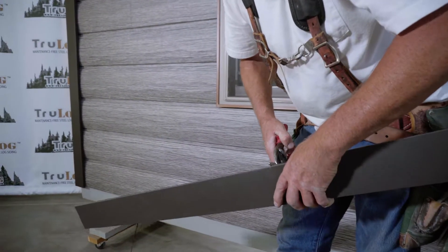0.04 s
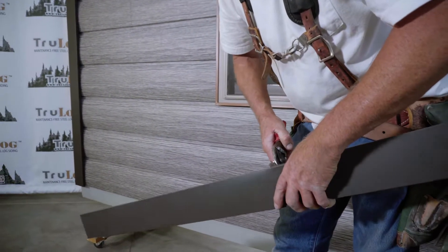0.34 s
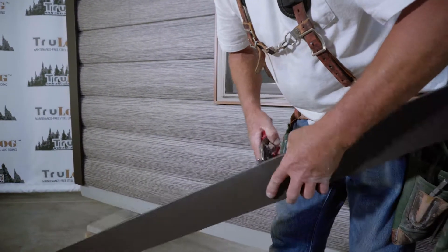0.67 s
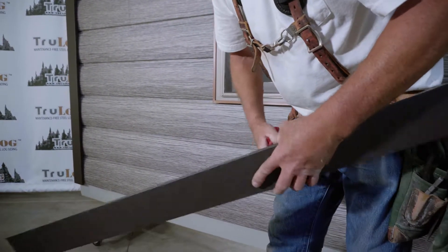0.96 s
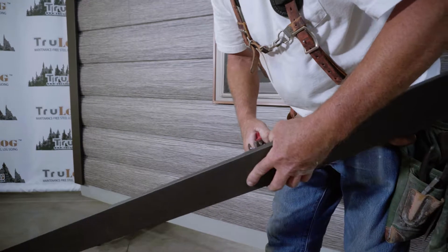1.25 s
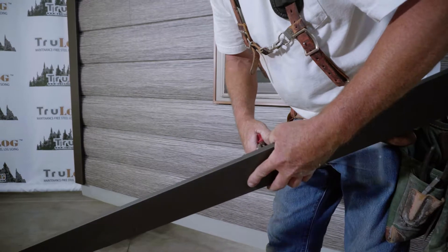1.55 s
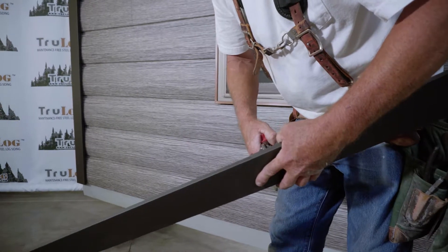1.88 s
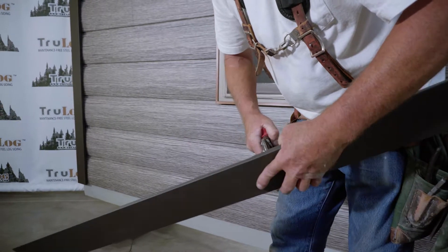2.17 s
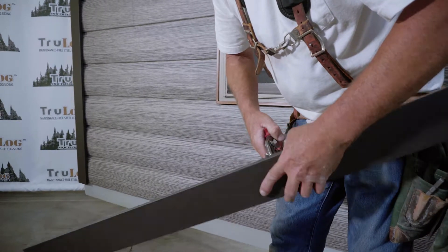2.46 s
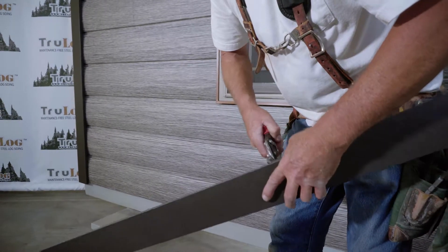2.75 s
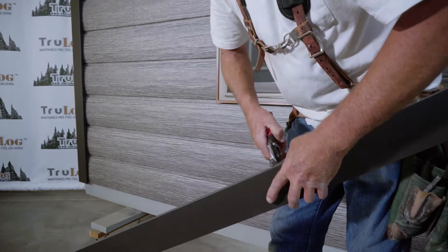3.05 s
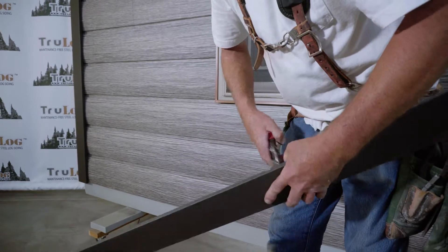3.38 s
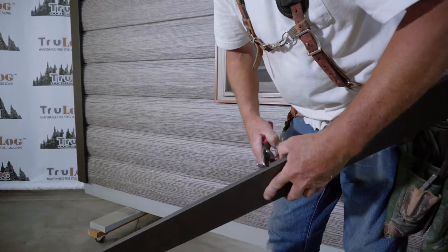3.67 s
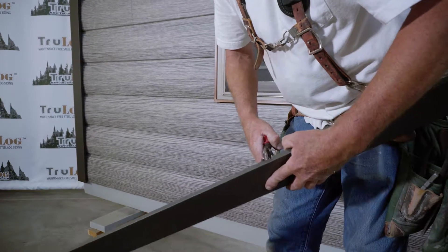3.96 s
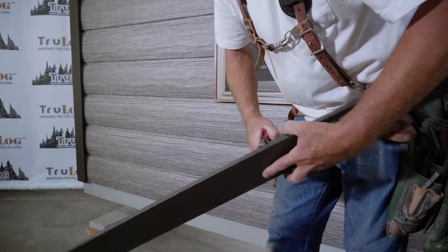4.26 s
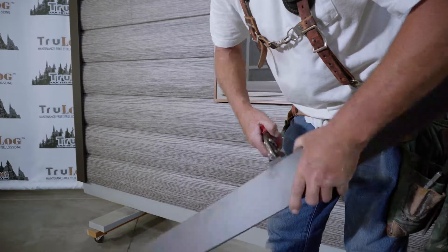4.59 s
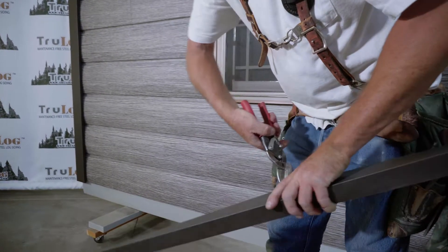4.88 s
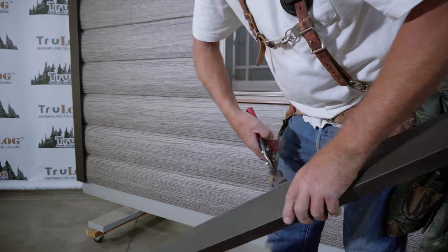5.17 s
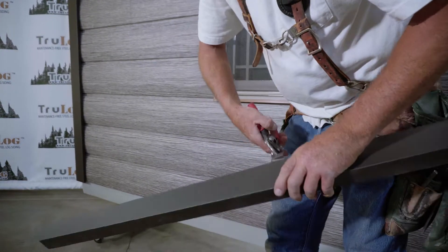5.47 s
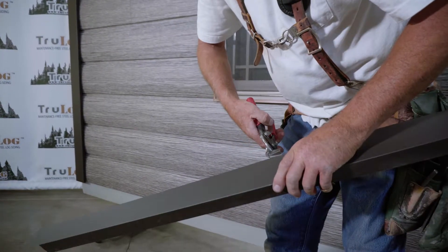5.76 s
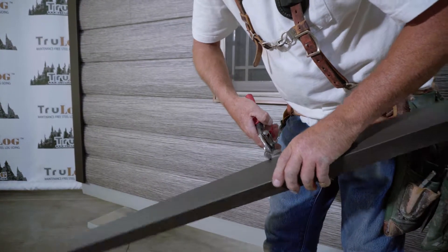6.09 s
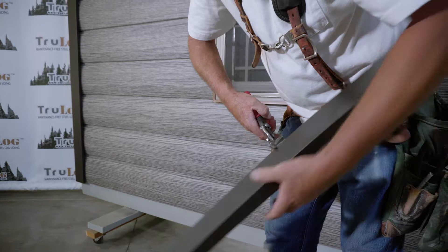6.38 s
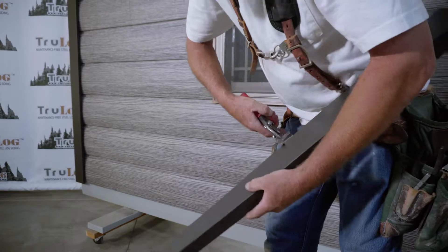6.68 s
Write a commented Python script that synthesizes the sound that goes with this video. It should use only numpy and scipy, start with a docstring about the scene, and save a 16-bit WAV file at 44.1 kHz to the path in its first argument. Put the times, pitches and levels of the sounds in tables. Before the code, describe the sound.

Hand snips cut a long sheet metal trim panel in a quiet workshop with a faint hush and a short room echo. It opens with a faint metallic ring, light pivot creaks and small, close jaw clicks. At about 0.9 seconds comes the loudest bite, a crisp crunch with a damped clang. A cluster of sharp snips follows from 1.5 to 2 seconds, setting the panel's edge ringing. Near 2.4 seconds the blade gives one brief, high squeal. More snips and a hard click fall between 3 and 3.5 seconds, then a longer crunch around 4 seconds. The blades rub softly along the cut edge between bites. A sharp click at 5.1 seconds leads to lighter bites and scraping from 5.5 to 6 seconds. At about 6.5 seconds the last bite snaps through with a bright ring, and the loose panel is knocked just after.

```python
"""Hand snips cutting sheet metal

Snips work through a long metal trim panel in a quiet workshop. Each bite is a run of tiny fractures
that sets the panel clanging and its folded edge ringing. Between bites the jaws click, creak, rub along
the cut edge and squeal once. The last bite snaps through, and the loose panel is knocked."""
import sys
import numpy as np
from scipy import signal
from scipy.fft import rfft, irfft, next_fast_len
from scipy.io import wavfile

SR = 44100
rng = np.random.default_rng(int(sys.argv[2]) if len(sys.argv) > 2 else 0)


def generate_wav(signal):
    """Clip the signal to [-1, 1] and save it as 16-bit WAV at the path in sys.argv[1]."""
    frames = np.transpose(np.atleast_2d(signal))
    scaled = np.clip(frames, -1, 1) * 32767
    pcm = np.round(scaled).astype(np.int16)
    wavfile.write(sys.argv[1], SR, pcm)


N = 301203
TIME = np.arange(N) / SR

# Tone colours of the still air, the panel's blur of close notes, and scratching steel.
# Each row: frequency in Hz, relative level in dB.
AIR_SPECTRUM = [(25, -17.5), (55, -13), (80, 4.5), (105, -3.5), (250, -8), (450, -8), (900, -4.5),
                (1400, -11.5), (2500, -12.5), (5000, -19.5), (13000, -20), (15500, -24.5)]
SHEET_SPECTRUM = [(75, -29), (160, -23.5), (205, -14.5), (270, -15.5), (370, -12), (480, -3.5),
                  (590, -17.5), (800, -13), (1020, -14.5), (1420, 4), (1700, -16.5), (1980, -4.5),
                  (2950, -22), (4000, -23.5), (5200, -25.5), (5900, -29.5), (7400, -31), (15500, -49.5)]
SCRATCH_SPECTRUM = [(1800, -23.5), (2700, 15.5), (3400, 1), (5200, -3.5), (8000, -5.5), (11000, -16.5),
                    (15500, -8.5)]

# Blades and hand sliding along the sheet.
# Each row: start in seconds, length in seconds, panel level in dB, scratch level in dB.
RUB_STROKES = [(0.207, 0.053, -69.5, -71), (0.35, 0.091, -61.5, -72), (0.548, 0.058, -63.5, -65),
               (0.642, 0.34, -60, -68), (0.937, 0.18, -61, -73), (1.288, .13, -51.5, -85),
               (1.407, 0.041, -61, -66), (1.698, 0.19, -49, -63.5), (2.001, .12, -54.5, -62),
               (2.227, 0.032, -61, -67), (2.52, 0.15, -66, -67.5), (2.936, 0.2, -61, -68),
               (3.36, 0.084, -69, -62), (3.866, 0.036, -54, -75), (4.1, 0.24, -60, -72),
               (4.353, 0.14, -63, -76.5), (4.524, 0.4, -65.5, -89), (5.085, 0.07, -57.5, -66),
               (5.607, 0.3, -53.5, -69.5), (5.981, 0.072, -50.5, -76), (6.2, 0.2, -58, -69),
               (6.502, 0.25, -46, -66)]
# The tones in the squeal. Each row: multiple of the lowest pitch, relative level in dB.
SQUEAL_TONES = [(1, 4), (2, 0), (3, -13.5), (4, -18)]
# Creaks of the pivot. Each row: start in seconds, length in seconds, knock level in dB.
PIVOT_CREAKS = [(0.138, .06, -57), (0.373, .11, -59.5), (0.73, .06, -60), (2.38, .015, -56),
                (2.695, .035, -57), (3.337, .03, -59), (5.15, .075, -57)]
# Hard catches of the jaws. Each row: start in seconds, pivot pitch in Hz, knock in dB, blade tick in dB.
JAW_CATCHES = [(0.4596, 2660, -49.5, -62), (0.4937, 2180, -46, -65.5), (0.578, 2550, -57, -53),
               (0.9867, 2800, -54, -55.5), (1.479, 2530, -53.5, -62.5), (2.1113, 2720, -51.5, -56),
               (2.2227, 2140, -52.5, -54), (2.909, 2390, -50, -47), (3.2654, 2200, -34, -54.5),
               (5.1054, 2674, -35.5, -45)]
# A mode is a note that an object rings at by itself. These belong to the blades.
# Each row: pitch in Hz, width in Hz (wider dies sooner), relative level in dB.
BLADE_MODES = [(4120, 1000, -1.5), (5240, 440, -4), (6500, 830, -3), (7330, 540, -7.5), (9700, 2500, 7)]

# Blows that ring the folded edge. Each row: start in seconds, level in dB.
EDGE_HITS = [(0.0, -47.5), (1.513, -36.5), (1.821, -39.5), (3.001, -42.5), (3.419, -38.5), (6.46, -32)]
# The folded edge's two modes. Each row: pitch in Hz, relative level in dB, ring time in seconds.
# A ring time (t60) is how long a sound takes to fall by 60 dB.
FOLD_MODES = [(1161, 0, .45), (1147, -8, .38)]
# The panel's clear modes.
# Each row: pitch in Hz, relative dB while whole, relative dB once cut through, ring time in seconds.
PANEL_MODES = [(211.6, -16.5, -25.5, .6), (240, -14, -23, 0.72), (420, -17.5, -21, .4),
               (448, -15, 1.5, 0.31), (468, -5, 0, 0.56), (746, -17, -11, 0.6), (1030, -13, -1.5, .25),
               (1153, 4.5, -4.5, 0.36), (1438, 10, 6, 0.19), (1496, 2, 4, 0.31), (1550, -11.5, -3, .45),
               (1936, -7.5, -1, 0.58), (1980, -5, 4, 0.39), (2520, -5, 5.5, 0.38), (2614, -8.5, 0, 0.29),
               (3267, -16, -14, 0.35), (3530, -29, -29, 0.26), (3815, -27, -26, 0.62),
               (4040, -17, -19, .25), (4420, -32, -20, 0.32), (4950, -23, -19.5, 0.28),
               (5250, -16.5, -26, .3), (7000, -21.5, -19.5, 0.2)]
# Borders in Hz of the panel's six bands, low to high: flex, body, clang, edge, fracture, sparkle.
BAND_EDGES_HZ = [60, 650, 1280, 1700, 3200, 7500, 16000]
# How each band answers a bite.
# Each row: dB added to the bite's level, share of its weight, share of its sharpness.
BAND_RESPONSE = [(-13, 1, 0.1), (-4.5, 0.71, 0), (-0.5, 0.079, 0.023), (-8, 0.16, .6), (-15.5, 0.085, 1.03),
                 (-25, 0.17, 1.2)]
# How each band dies away. Each row: ring time under the hand in seconds, ring time of the late
# shimmer in seconds, relative shimmer level in dB, relative dry crack level in dB.
BAND_DAMPING = [(0.14, 0.51, -14.5, -7), (0.11, 0.25, -22, -6), (0.11, 0.62, -27.5, -7),
                (0.17, .55, -25.5, -2.5), (0.12, 0.62, -20, -3.5), (0.11, 0.43, -19.5, -4.5)]
# Bites and knocks on the panel. Each row: start in seconds, crunch length in seconds, level in dB,
# weight (extra bass) in dB, sharpness (extra treble) in dB, extra ringing from a loose grip in dB.
PANEL_BITES = [(0.0, 0.0032, -60, 14.5, 1.5, 7.5), (0.882, .014, -20, -11.5, -3.5, 0),
               (1.259, 0.0023, -48.5, 1.5, 6.5, -1), (1.512, .0003, -30, -7.5, -6, -2.5),
               (1.581, 0.00092, -39, -12, -10, -4), (1.6198, 0.00089, -31, -0.5, 1, -3),
               (1.821, .006, -39.5, 2.5, -5, 0), (1.864, 0.0027, -49, -1, 7, -18),
               (1.963, .002, -51, 0.5, 2, 1.5), (2.399, 0.033, -45.5, 7, 2.5, 5.5),
               (2.513, .01, -48.5, 2.5, -12, -3), (2.566, .005, -45, 0, -5, -0.5),
               (2.75, 0.0051, -61, 7.5, 11.5, -3), (2.996, 0.0065, -40.5, 3.5, 6, -4.5),
               (3.215, 0.0052, -60.5, 8.5, 5.5, 1), (3.402, .007, -53.5, 2.5, 0, -8),
               (3.418, 0.0056, -40, -5.5, -1, 0), (3.838, 0.029, -52, -1, 4.5, 0),
               (3.9777, .002, -45, -1, 10, 1.5), (4.035, 0.011, -35, -18, 0, 1.5),
               (4.073, 0.031, -34.5, -3.5, -5, -0.5), (4.217, 0.003, -47.5, -1.5, 3, 3.5),
               (4.266, 0.0018, -46, 2.5, -6, -2.5), (4.73, 0.0024, -57.5, 0, -7, -1),
               (4.842, 0.0028, -57, 0, -3.5, -15), (5.489, 0.0033, -39.5, 2, -3.5, -1.5),
               (5.5617, 0.0027, -42.5, 3, 4, -3.5), (5.615, .012, -44, -8, -20, 0),
               (5.667, 0.007, -46, 4.5, -5, -9), (5.784, .005, -52, -2, -2, 4),
               (5.842, .004, -52.5, 9, 1.5, 2), (5.942, 0.027, -40.5, 5.5, -6.5, 1.5),
               (6.202, 0.0021, -50.5, 4.5, 1.5, -7.5), (6.461, 0.0091, -29, -1.5, 9, 6.5),
               (6.671, 0.0028, -32.5, 10.5, -4, 3)]


def from_db(db):
    """Turn decibels into a number to multiply by."""
    return 10 ** (np.asarray(db) / 20)


def rms_one(x, size=None):
    """Scale x so that its first `size` samples have an average strength (rms) of 1."""
    return x / np.sqrt(np.mean(x[:size] ** 2) + 1e-20)


def add(out, start, x):
    """Mix x into out, beginning at `start` seconds."""
    at = max(0, round(start * SR))
    out[at:at + len(x)] += x[:max(0, N - at)]


def band(x, low_hz, high_hz, order=3):
    """Keep the part of x between two frequencies."""
    return signal.sosfilt(signal.butter(order, [low_hz, high_hz], "band", fs=SR, output="sos"), x)


def coloured(x, spectrum):
    """Shape x with a tone colour that falls away below its lowest frequency and holds its last level above its
    highest; the result has strength 1."""
    hz, db = np.transpose(spectrum)
    size = next_fast_len(len(x))
    f = np.maximum(np.arange(size // 2 + 1) * SR / size, 1)
    gain = from_db(np.interp(np.log(f), np.log(hz), db)) * np.minimum(f / hz[0], 1) ** 2
    return rms_one(irfft(rfft(x, size) * gain, size)[:len(x)])


def drift(per_s):
    """A random wander that heads for a new value `per_s` times a second."""
    points = rng.standard_normal(N // 20)
    return np.interp(TIME * per_s, np.arange(len(points)), points)


def fade(t, t60):
    """The falling level of something left to ring."""
    return np.exp(-np.log(1000) * t / t60)


def ring(x, hz, t60):
    """One mode: every click in x starts a fading tone."""
    decay, angle = fade(1 / SR, t60), 2 * np.pi * hz / SR
    return signal.lfilter([0, np.sin(angle)], [1, -2 * decay * np.cos(angle), decay * decay], x + 1e-18)


def stroke(start, length, t60, attack=0.031):
    """The level of a push: it swells, holds for the rest of its length, then dies away."""
    swell = np.sin(np.pi / 2 * np.clip((TIME - start) / attack, 0, 1)) ** 2
    return swell * fade(np.clip(TIME - start - length, 0, 2 * t60), t60)


def slip_energy(t, length, first_share, per_s=1400, spread_db=4):
    """Metal gives way in one first break, then a run of small uneven slips; their energy adds up to 1."""
    slips = (rng.random(len(t)) < per_s / SR) * from_db(spread_db * rng.standard_normal(len(t))) ** 2
    slips = slips * np.exp(-(t / length) ** 2)
    slips = (1 - first_share) * slips / (slips.sum() + 1e-12)
    slips[0] += first_share
    return slips / slips.sum()


def room_air(level_db=-76.5):
    """The faint, steady hush of the room."""
    return from_db(level_db) * coloured(rng.standard_normal(N), AIR_SPECTRUM)


def room_echo(x, t60=0.27, echo_db=-15, gap_s=0.016, dull_hz=7000):
    """Walls and floor add a short wash of echoes, duller than the sound itself."""
    t = np.arange(SR // 2) / SR
    tail = rng.standard_normal(len(t)) * fade(t, t60) * (t > gap_s)
    tail = signal.sosfilt(signal.butter(1, dull_hz, fs=SR, output="sos"), tail)
    return x + from_db(echo_db) * signal.fftconvolve(x, tail / np.linalg.norm(tail))[:N]


def rubbing(grains_per_s=2500, wash_db=-7, modes_db=-5, flex_db=-10, scratch_db=-2):
    """Rough edges slide past each other: tiny ticks (grains) scratch and keep the panel murmuring."""
    murmur = sum(from_db(db) * stroke(start, length, t60=0.34) for start, length, db, _ in RUB_STROKES)
    scrape = sum(from_db(db) * stroke(start, length, t60=0.29) for start, length, _, db in RUB_STROKES)
    sizes = from_db(3.5 * np.minimum(rng.exponential(1, N), 4)) * rng.standard_normal(N)
    grains = sizes * (rng.random(N) < grains_per_s * from_db(4 * drift(70)) / SR)
    wash = coloured(grains, SHEET_SPECTRUM)
    modes = rms_one(sum(from_db(db) * ring(grains, hz, t60 / 2) for hz, db, _, t60 in PANEL_MODES))
    flex = rms_one(band(rng.standard_normal(N), 510, 920, order=2))
    panel = from_db(wash_db) * wash + from_db(modes_db) * modes + from_db(flex_db) * flex
    # only a quarter of the grains catch hard enough to tick in the treble
    catches = grains * (rng.random(N) < .25)
    scratch = from_db(scratch_db) * coloured(catches, SCRATCH_SPECTRUM)
    return panel * murmur + scratch * scrape


def squeal(start=2.425, length=.058, hz=3915, level_db=-45, rise_per_s=0.45, chatter_db=2, ring_db=-14.5):
    """The blade sticks and slips on the cut edge: a rough, rising whistle, brighter when pushed harder."""
    push = stroke(start, length, t60=0.08, attack=0.03)
    climb = rise_per_s * (np.minimum(TIME - start, length) - length / 2)
    waver = 0.029 * drift(1800)
    phase = 2 * np.pi * np.cumsum(hz * (1 + climb + waver)) / SR
    tone = sum(from_db(db) * push ** (1 + 0.43 * k) * np.sin(multiple * phase)
               for k, (multiple, db) in enumerate(SQUEAL_TONES))
    tone = from_db(level_db + chatter_db * drift(350)) * tone
    # the blade rings on at the two lowest tones
    blade = sum(ring(tone, k * hz, t60=0.44 / k) for k in (1, 2))
    return tone + from_db(ring_db) * tone.std() * rms_one(blade)


def creak_catches(step_s=.018, jitter=0.29, hz=2625, tick_db=-8.5, scatter_db=3.5):
    """The pivot creaks in a run of light, uneven catches; gives rows like those of JAW_CATCHES."""
    rows = []
    for start, length, db in PIVOT_CREAKS:
        for k, (late, knock, tick) in enumerate(rng.standard_normal((12, 3))):
            if k * step_s < length:
                when = start + step_s * (k + jitter * late)
                rows.append((when, hz, db + scatter_db * knock, db + tick_db + scatter_db * tick))
    return rows


def blade_tick(t, detune=0.052):
    """The steel blades ring very briefly, at slightly different pitches each time."""
    tick = np.zeros(len(t))
    for k, (hz, width_hz, db) in enumerate(BLADE_MODES):
        pitch = hz * (1 + detune * rng.standard_normal())
        tick += (-1) ** k * from_db(db) * np.exp(-np.pi * width_hz * t) * np.sin(2 * np.pi * pitch * t)
    return tick * (1 - np.exp(-t / .0008))


def jaw_clicks(sheet_db=-20, clean_jump_db=-42):
    """Steel catches and lets go: a hard catch frees itself in one jump, a light one stutters."""
    t, out = np.arange(SR // 5) / SR, np.zeros(N)
    first_4_ms = SR // 250
    sheet = coloured(rng.standard_normal(N), SHEET_SPECTRUM)
    for start, pivot_hz, pivot_db, blade_db in JAW_CATCHES + creak_catches():
        first_share = np.interp(pivot_db - clean_jump_db, [-15, 0], [.3, .97])
        jolts = np.sqrt(slip_energy(t, .012, first_share)) * rng.choice([-1, 1], len(t))
        knock = rms_one(t * np.exp(-t / .00062) * np.sin(2 * np.pi * pivot_hz * t), first_4_ms)
        tick = rms_one(blade_tick(t), first_4_ms)
        add(out, start, signal.fftconvolve(jolts, from_db(pivot_db) * knock + from_db(blade_db) * tick))
        # the jaws pass a little of the jolt on to the sheet
        wash = sheet[rng.integers(N - SR):][:len(t)]
        add(out, start, from_db(pivot_db + sheet_db) * fade(t, t60=0.34) * wash)
    return out


def edge_ring():
    """The stiff folded edge rings at two close pitches, heard as one pulsing tone."""
    t, out = np.arange(SR) / SR, np.zeros(N)
    onset = 1 - fade(t, t60=0.0041)
    tone = onset * sum(from_db(db) * fade(t, t60) * np.sin(2 * np.pi * hz * t)
                       for hz, db, t60 in FOLD_MODES)
    for start, db in EDGE_HITS:
        add(out, start, from_db(db) * tone)
    return out


def mode_crowd():
    """The sheet's many close modes blur into noise; in the treble they stand apart as narrow peaks."""
    f = np.fft.rfftfreq(N, 1 / SR)
    peaks = np.interp(f, np.linspace(0, SR / 2, 900), rng.standard_normal(900))
    depth_db = np.interp(f, [1300, 2600], [0, 4])
    return coloured(irfft(rfft(rng.standard_normal(N)) * from_db(depth_db * peaks), N), SHEET_SPECTRUM)


def stored_energy(slips, t60):
    """The energy in the sheet: each slip tops it up, and it steadily leaks away."""
    return signal.lfilter([1], [1, -fade(2 / SR, t60)], slips + 1e-18)


def bites(cut_through_s=6.4, snap_s=0.0016, contact_hz=3200, modes_db=-15, scatter_db=3):
    """Tiny fractures shake the sheet: a dry crack, a clang muffled by the hand, clear notes, a shimmer."""
    t, out, crowd = np.arange(SR) / SR, np.zeros(N), mode_crowd()
    first_40_ms = SR // 25
    soften = signal.butter(2, contact_hz, fs=SR, output="sos")
    for start, length, bite_db, weight_db, sharp_db, loose_db in PANEL_BITES:
        # a crunch of length snap_s spends half its energy in the first break; longer ones spend less
        slips = slip_energy(t, length, first_share=snap_s / (snap_s + length))
        band_levels_db = bite_db + np.array(BAND_RESPONSE) @ [1, weight_db, sharp_db]
        jolts = signal.sosfilt(soften, np.sqrt(slips) * rng.choice([-1, 1], SR) + 1e-18)
        wash = crowd[rng.integers(N - SR):][:SR]
        chance_db = scatter_db * rng.standard_normal(len(PANEL_MODES))
        phase = 2 * np.pi * rng.random(len(PANEL_MODES))
        swell = np.sqrt(np.cumsum(slips))
        for low, high, db, damping in zip(BAND_EDGES_HZ, BAND_EDGES_HZ[1:], band_levels_db, BAND_DAMPING):
            held_t60, shimmer_t60, shimmer_db, crack_db = damping
            shimmer = from_db(shimmer_db) ** 2 * stored_energy(slips, shimmer_t60)
            clang = wash * np.sqrt(stored_energy(slips, held_t60) + shimmer)
            for k, (hz, whole_db, cut_db, t60) in enumerate(PANEL_MODES):
                if low <= hz < high:
                    note_db = whole_db if start < cut_through_s else cut_db
                    gain = from_db(note_db + modes_db + loose_db + chance_db[k])
                    clang += gain * swell * fade(t, t60) * np.sin(2 * np.pi * hz * t + phase[k])
            clang = rms_one(band(clang, low, high), first_40_ms)
            crack = rms_one(band(jolts, max(low, 250), high, order=2), first_40_ms)
            add(out, start, from_db(db) * rms_one(clang + from_db(crack_db) * crack, first_40_ms))
    return out


def scene():
    """The long panel sounds out into the room; the jaw clicks are small and close, so they get no echo."""
    panel = room_echo(bites() + edge_ring() + rubbing() + squeal())
    air = room_air()
    return (panel + jaw_clicks() + air)[None]


def record(dry):
    """Cut away the highest treble, above 16000 Hz."""
    return signal.sosfilt(signal.ellip(10, .1, 70, 16000, fs=SR, output="sos"), dry)


dry = scene()
out = record(dry)
generate_wav(out)
```